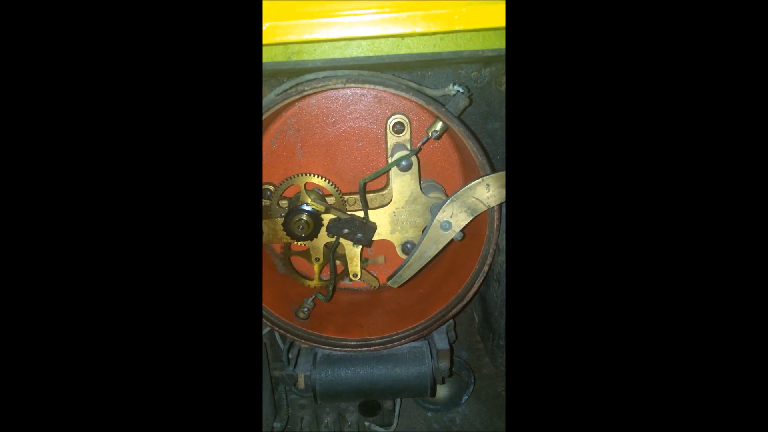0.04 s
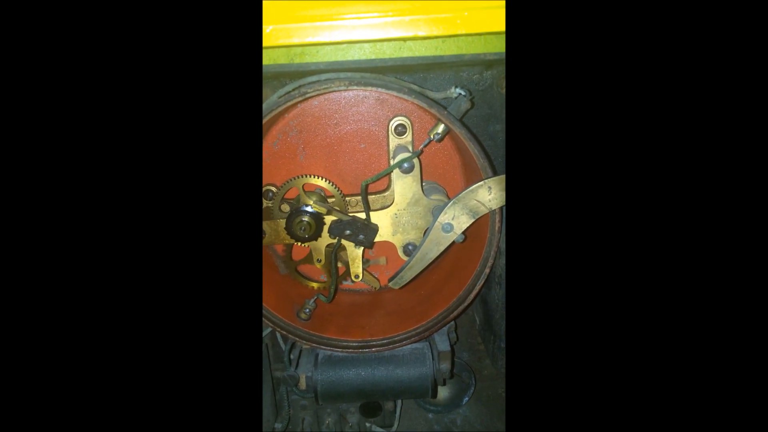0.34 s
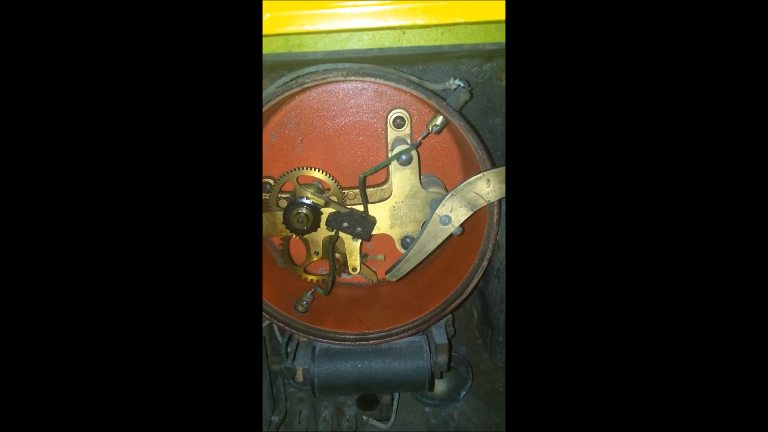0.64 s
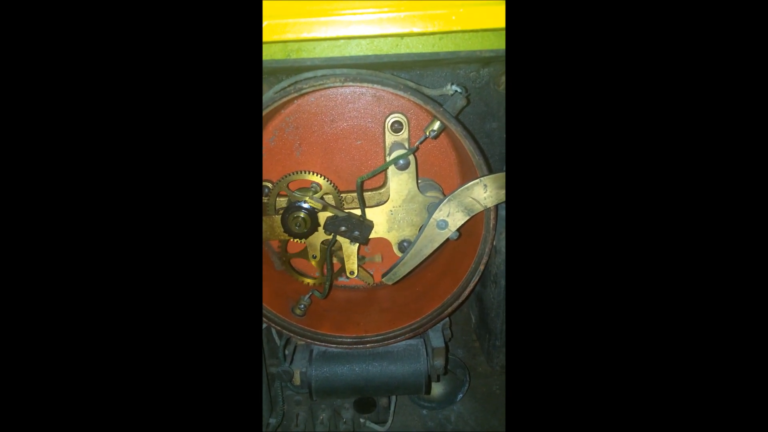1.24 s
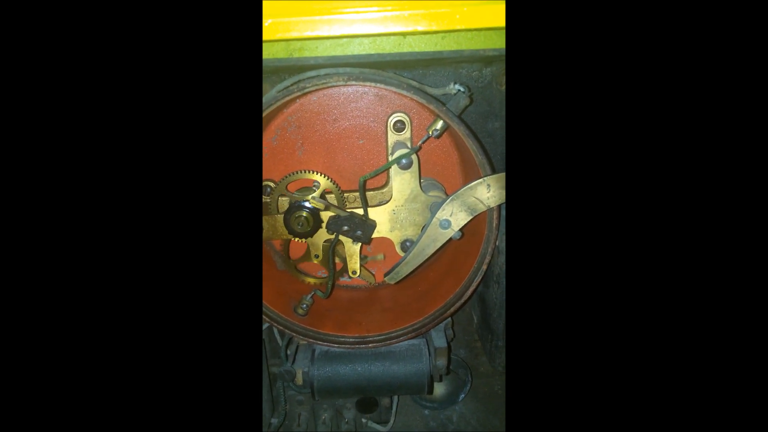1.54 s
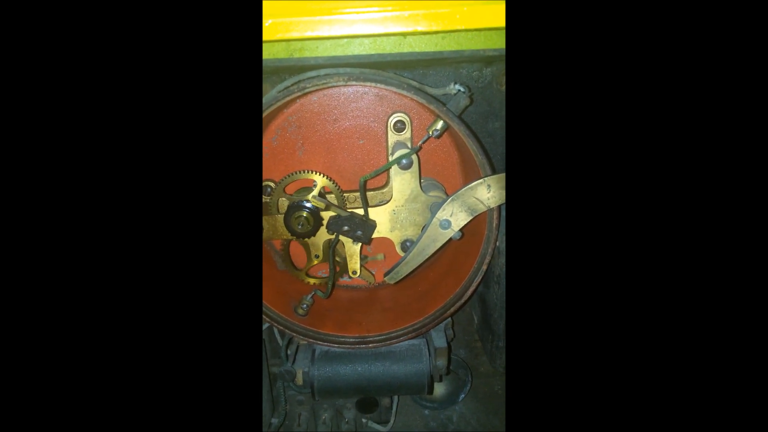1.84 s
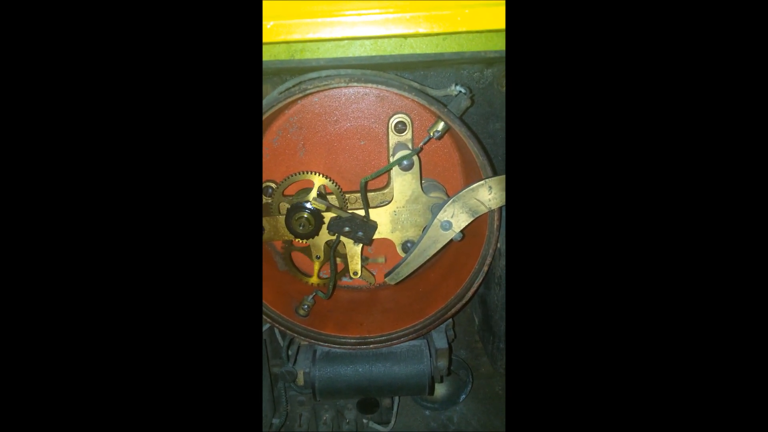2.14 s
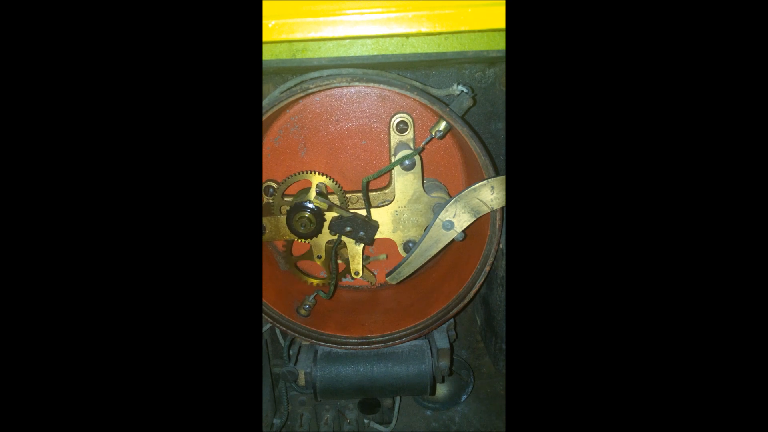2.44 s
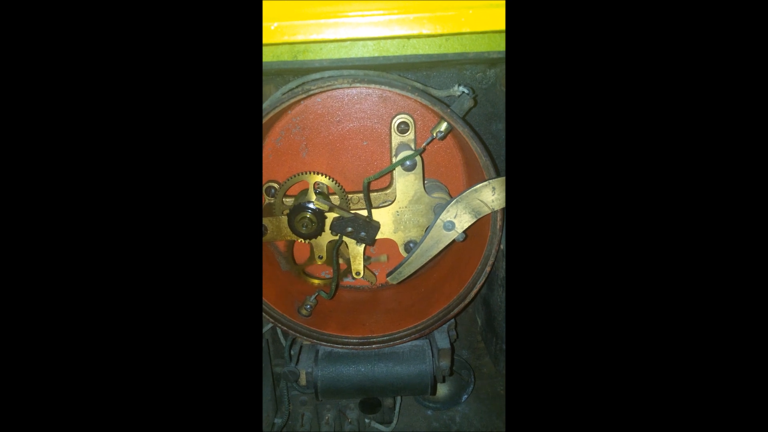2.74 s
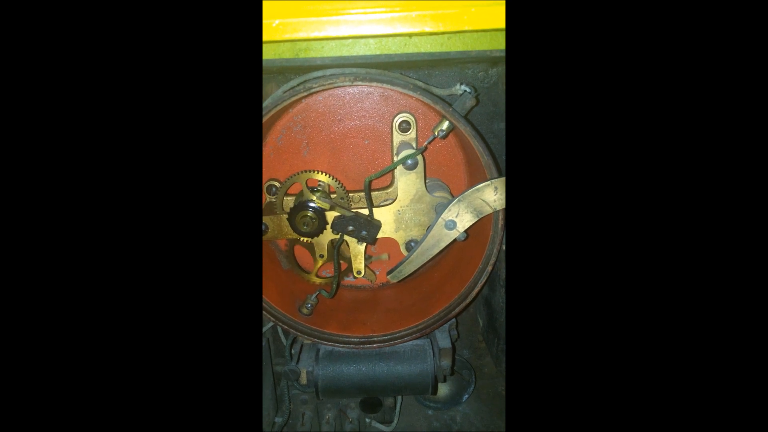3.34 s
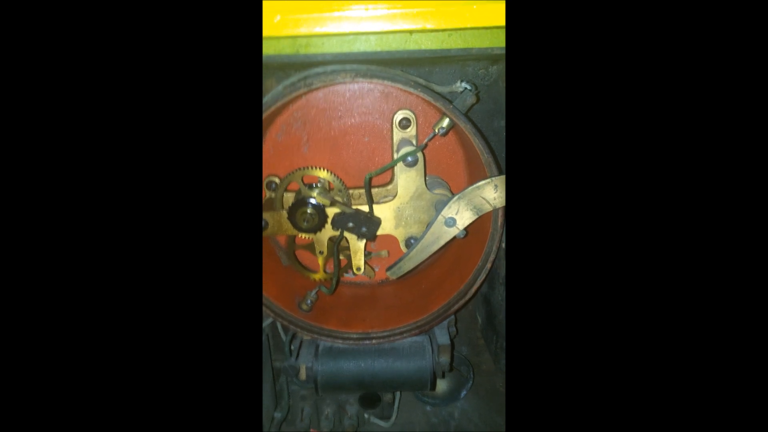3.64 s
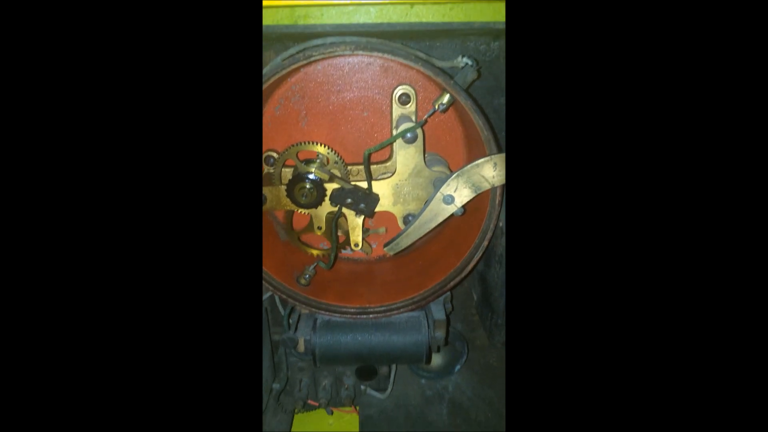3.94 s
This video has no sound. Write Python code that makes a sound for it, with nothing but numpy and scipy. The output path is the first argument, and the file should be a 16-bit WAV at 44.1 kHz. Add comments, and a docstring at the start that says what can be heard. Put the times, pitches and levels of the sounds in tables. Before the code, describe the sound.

Rapid ratcheting clatter of clockwork gears in an old alarm box, heard up close.

```python
"""Close beside an old alarm box, its clockwork runs down. The gear train grinds and ticks, while
the escapement's pallets strike the wheel teeth in a fast, limping rattle and chatter after each
blow. The impacts excite the normal modes of brass plates and the iron case, which ring briefly.
Now and then the rattle dips and thins to a ring; a few soft, low knocks lie underneath."""
import sys
import numpy as np
from scipy import signal
from scipy.fft import rfft, irfft, next_fast_len
from scipy.io import wavfile
from scipy.ndimage import uniform_filter1d

SR = 44100
rng = np.random.default_rng(int(sys.argv[2]) if len(sys.argv) > 2 else 0)


def waveform_to_disk(signal):
    """Save audio, clipped to [-1, 1], as 16-bit WAV at the path in sys.argv[1]."""
    frames = np.transpose(np.atleast_2d(signal))
    scaled = np.clip(frames, -1, 1) * 32767
    samples = np.round(scaled).astype(np.int16)
    wavfile.write(sys.argv[1], SR, samples)


N = 176400
ATTACK_S, TOP_HZ = 0.00078, 15300  # rise time of an impact; upper band limit

# friction of the gear train (time [s], level [dB])
GRIND_LEVEL = [(0, -24.5), (.3, -32.5), (.5, -27), (.8, -30), (.92, -28), (1.1, -26.5), (1.38, -28),
               (1.7, -28), (1.85, -27), (2.08, -29.5), (2.33, -25), (2.6, -29), (2.85, -27.5), (3.2, -27),
               (3.45, -28), (3.68, -25.5), (4, -33)]
# pallet strikes (time [s], level [dB], level offset of the chatter [dB])
PALLET_STRIKES = [(0.0266, -16.5, -7.5), (0.0837, -12, -14), (0.1073, -16, -19), (0.1336, -16, -2),
                  (0.16, -18, -18), (0.197, -17.5, -23), (0.2164, -15.5, -27), (0.2405, -10.5, -10),
                  (0.2601, -14.5, -21), (0.285, -11.5, -8), (0.3071, -18, 0), (0.335, -15.5, -5),
                  (0.3671, -15.5, -14), (0.3874, -8, -6), (0.4112, -13.5, -8), (0.43, -9.5, -8.5),
                  (0.4602, -14, -7), (0.477, -8.5, -7), (0.496, -30, -18), (0.5142, -10, -3.5),
                  (0.5355, -13.5, -11), (0.5597, -13, -20), (0.6014, -8.5, -14), (0.625, -15.5, -7),
                  (0.6485, -12.5, -15), (0.663, -23, -18), (0.683, -22, -20), (0.7023, -10, -8),
                  (0.7308, -18.5, -9), (0.7551, -12, -24), (0.7882, -17, -20), (0.8109, -11.5, -22),
                  (0.852, -17.5, -19), (0.875, -11, -24), (0.938, -14, -7), (0.9489, -12, -6),
                  (0.9725, -16, -26), (0.9951, -10, -2), (1.011, -14, -22), (1.0344, -7, -13),
                  (1.0614, -15, -5), (1.0783, -10.5, 0), (1.0989, -15.5, 1), (1.1138, -9.5, -8),
                  (1.1369, -16.5, 0.5), (1.1504, -9.5, -7), (1.1898, -11.5, -3), (1.225, -9.5, -6),
                  (1.2454, -18, -19), (1.263, -11, -6.5), (1.3013, -13, -1.5), (1.3457, -13, -28),
                  (1.382, -22.5, -10), (1.4042, -17, -19), (1.4367, -15.5, -29), (1.456, -8.5, -7),
                  (1.4711, -9.5, -12.5), (1.5003, -12.5, -9.5), (1.521, -19, 3), (1.5423, -14, -7),
                  (1.572, -19, -3), (1.5914, -10.5, -9), (1.6211, -13.5, -9), (1.6383, -8, -9),
                  (1.6546, -15, -21), (1.6709, -8.5, -5), (1.7029, -7, -14.5), (1.7262, -15, -13),
                  (1.744, -17.5, 3), (1.772, -17, -5), (1.791, -13.5, -35), (1.8168, -22.5, -4),
                  (1.8389, -12.5, -20), (1.874, -17, -14), (1.8952, -15.5, -0.5), (1.9305, -12.5, -8),
                  (1.986, -15.5, -16), (2.0197, -17, -28), (2.0436, -11, -25), (2.084, -15.5, -22),
                  (2.1079, -11.5, -12), (2.1426, -15.5, -29), (2.1632, -11.5, -5), (2.1828, -10.5, -12),
                  (2.2046, -12.5, -7), (2.2462, -10.5, -8.5), (2.2731, -15, -6), (2.2881, -8.5, -4.5),
                  (2.3209, -7, -11), (2.3569, -9, -10), (2.4038, -12.5, -7), (2.45, -11, -9),
                  (2.4702, -18, -8), (2.4902, -12, -21), (2.5228, -13, -13), (2.561, -17.5, -13),
                  (2.592, -18.5, -12), (2.629, -23.5, -2), (2.6548, -12.5, -11), (2.6796, -17.5, -12),
                  (2.702, -24.5, 5.5), (2.7318, -14.5, -11), (2.7493, -9.5, -1), (2.7698, -21, 1),
                  (2.7849, -7, -10), (2.8153, -15.5, -5), (2.8354, -10, -7), (2.8622, -15, -23),
                  (2.8769, -8, -4), (2.9073, -8.5, -6.5), (2.929, -16, -15), (2.9451, -10, -6),
                  (2.9816, -9, -9), (3.0195, -7.5, -8), (3.0408, -10, -15), (3.0608, -16, -3),
                  (3.0817, -14.5, -3), (3.104, -14, -3.5), (3.1596, -14.5, -23), (3.174, -22, -15),
                  (3.1902, -9.5, -6), (3.2093, -16, -10), (3.2264, -8.5, -18), (3.2522, -16.5, -21),
                  (3.2657, -9, -7), (3.286, -22, -6), (3.3013, -8.5, -6.5), (3.337, -11.5, -6),
                  (3.38, -12, -8.5), (3.4047, -21, -24), (3.4204, -8.5, -4), (3.4387, -15, -21),
                  (3.4704, -14, -15), (3.4914, -18.5, -13), (3.5088, -8.5, -6.5), (3.5488, -10.5, -14),
                  (3.5751, -16, -8), (3.5928, -9.5, -7.5), (3.6279, -9.5, -8), (3.6692, -9, -9),
                  (3.6862, -17.5, -0.5), (3.7128, -19.5, -0.5), (3.7588, -9, -19), (3.7924, -20, -4),
                  (3.8142, -11, -4), (3.8526, -13, -13), (3.882, -20, -5), (3.8995, -15.5, -5),
                  (3.931, -15.5, -20), (3.955, -10.5, -15), (3.9768, -16, -6)]
# modes of the brass plates and levers (frequency [Hz], T60 [s], level [dB])
BRASS_MODES = [(1895, 0.28, -3), (2990, 0.12, -9.5), (3031, 0.035, 3), (3113, 0.029, 1),
               (3976, 0.029, -0.5), (4624, 0.044, -1), (4732, 0.044, -2), (5307, 0.035, 0),
               (6100, 0.031, -4), (6960, 0.02, -4), (7260, 0.054, -2), (7850, 0.025, -0.5),
               (8246, 0.021, -1), (9175, 0.038, -2)]
# dips in the rattle (time [s], length [s], ring level [dB], first tone [Hz], second tone [Hz])
RATTLE_DIPS = [(.182, .014, -21, 3978, 8170), (.587, 0.014, -20, 3084, 8000), (.925, 0.03, -35, 5330, 3994),
               (1.171, 0.01, -20.5, 7340, 1870), (1.418, 0.0097, -24, 4021, 4720),
               (1.759, 0.016, -21, 7897, 1870), (2.228, 0.015, -23.5, 4800, 5270),
               (2.539, 0.027, -24, 6013, 2990), (2.697, 0.014, -22.5, 8230, 1420),
               (3.148, 0.01, -21, 5598, 3074), (3.36, 0.019, -19.5, 3010, 5340),
               (3.914, .016, -24.5, 1990, 9458)]


def amp(db):
    """Amplitude ratio of a level in decibels."""
    return 10 ** (np.asarray(db) / 20)


def unit(x):
    """Normalisation to rms 1."""
    return x / np.sqrt(np.mean(x ** 2))


def curve(rows, t):
    """Gain interpolated in decibels between rows of (time [s], level [dB])."""
    return amp(np.interp(t, *np.array(rows).T))


def butterworth(x, order, hz, kind):
    """Filter with a maximally flat passband."""
    return signal.sosfilt(signal.butter(order, hz, kind, fs=SR, output="sos"), x)


def through(x, response):
    """Convolution with an impulse response scaled to unit energy."""
    return signal.fftconvolve(x, response / np.linalg.norm(response))[:N]


def colour(points, size=2048):
    """Minimum-phase impulse response of a given spectrum, found by folding the cepstrum."""
    hz, db = np.array(points).T
    f = np.maximum(np.arange(size // 2 + 1) * SR / size, 1)
    magnitude = amp(np.interp(np.log(f), np.log(hz), db))
    cepstrum = irfft(np.log(magnitude))
    cepstrum[1:size // 2] *= 2
    cepstrum[size // 2 + 1:] = 0
    return irfft(np.exp(rfft(cepstrum)))


def tooth_load(t, drop_s=0.01, drop_db=2):
    """Contact noise follows load: its gain falls as the wheel drops free ahead of each strike."""
    strikes = np.sort(np.array(PALLET_STRIKES)[:, 0])
    wait = np.append(strikes, np.inf)[np.searchsorted(strikes, t)] - t
    return amp(-drop_db * np.exp(-(wait / drop_s) ** 2))


def friction(t, grain_db=4):
    """Sliding friction of meshing teeth gives a continuous, grainy random force."""
    grains = rng.standard_normal(N) * amp(grain_db * rng.standard_normal(N))
    return unit(grains) * curve(GRIND_LEVEL, t)


def gear_train(t):
    """Friction noise: loaded teeth grind, with less top treble than the clicks."""
    # spectrum of the grinding teeth (frequency [Hz], spectral level [dB])
    teeth_spectrum = [(25, -23), (70, -9.5), (190, -19), (250, -23.5), (340, 3.5), (550, -7), (700, 5.5),
                      (900, -0.5), (1100, -1), (1900, 8), (2700, -3.5), (4500, -6.5), (8000, -14),
                      (15000, -5.5)]
    grind = through(friction(t) * tooth_load(t), colour(teeth_spectrum))
    return amp(-3) * butterworth(grind, 3, 8000, "low")


def wander(shifts_per_s=25):
    """Slow random modulation with a spread near 1, renewed about once a tooth."""
    steps = rng.standard_normal(int(shifts_per_s * N / SR) + 2)
    position = np.arange(N) * shifts_per_s / SR + rng.random()
    return np.interp(position, np.arange(len(steps)), steps)


def ring(force, modes, drift, spread_db=2.2):
    """Modal superposition: damped modes shift in pitch and strength as turning parts press on a body."""
    out = np.zeros(N)
    for hz, t60, db in modes:
        phasor = np.exp(2j * np.pi * np.cumsum(hz * (1 + drift * wander())) / SR)
        pole = np.exp(-np.log(1000) / (t60 * SR))
        drive = force * amp(spread_db * wander())
        mode = phasor * signal.lfilter([1], [1, -pole], drive * phasor.conj())
        out += rng.choice([-1, 1]) * amp(db) * np.sqrt(2 * (1 - pole ** 2)) * mode.imag
    radiated = butterworth(out, 3, 242, "high")  # small bodies radiate little bass
    return radiated / np.linalg.norm(amp(np.array(modes)[:, 2]))


def iron_case(impacts, t):
    """Forced vibration: impacts and gear friction drive the modes of the case."""
    # modes of the iron case (frequency [Hz], T60 [s], level [dB])
    case_modes = [(189.5, 0.15, -16), (354, 0.76, -9), (390, 0.2, -11), (445.6, 0.39, -13),
                  (501, 0.14, -14.5), (628.8, 0.18, -3.5), (681.8, 0.2, -1), (715, 0.35, -5.5),
                  (797, 0.15, -1.5), (822.5, 0.29, -1.5), (1056, 0.014, 0), (1293, 0.027, -2),
                  (1391.5, 0.14, 0.5), (1495, 0.071, 0), (1673, 0.049, -6), (1697, 0.071, -3.5),
                  (2047, 0.025, -3), (2103, 0.026, 3.5)]
    return ring(amp(-10) * impacts + amp(-8) * friction(t), case_modes, drift=.008)


def contacts(times, gains, rise_s, decay_s, grain_db):
    """Tiny metal contacts merge into decaying noise bursts, each with the energy of 5 ms at rms = gain."""
    size = SR // 20
    t, out = np.arange(size) / SR, np.zeros(N + 2 * size)
    envelope = np.minimum(t / rise_s, 1) * np.exp(-np.maximum(t - rise_s, 0) / decay_s)
    for start, gain in zip(times, gains):
        noise, grain = rng.standard_normal((2, size))
        burst = envelope * noise * amp(grain_db * grain)
        i = int(np.clip(start * SR, 0, N))
        out[i:i + size] += gain * burst * np.sqrt(.005 * SR / np.sum(burst ** 2))
    return out[:N]


def backlash(ticks_per_s=85, level_db=2, spread_db=2):
    """Clearance lets loose gear teeth collide, ticking at uneven moments."""
    count = int(ticks_per_s * N / SR)
    times = (np.arange(count) + rng.random(count)) * N / SR / count
    gains = curve(GRIND_LEVEL, times) * amp(level_db + spread_db * rng.standard_normal(count))
    return contacts(times, gains, ATTACK_S, decay_s=0.0027, grain_db=2)


def metal_clack(force):
    """Source and filter: the contact force takes on the spectrum of metal hitting metal."""
    # spectrum of the clack (frequency [Hz], spectral level [dB])
    clack_spectrum = [(150, -30), (600, -39), (1100, -19.5), (1500, -2.5), (2200, 0), (2700, -3),
                      (3100, 5.5), (3600, -9), (4500, 1.5), (5000, -6), (5700, -3), (6300, 0), (8200, -1),
                      (8700, -13), (11000, -7.5), (15000, -20)]
    return amp(-3.5) * through(force, colour(clack_spectrum))


def tip_snap(force, t):
    """Impacts of the tooth tips radiate a bright, high-frequency snap."""
    # spectrum of the snap (frequency [Hz], spectral level [dB])
    snap_spectrum = [(2000, -28), (6000, -30), (8000, 2.5), (12500, 4), (13300, 0), (15200, -7)]
    # slow swell and fall of the treble (time [s], level [dB])
    treble_level = [(0, -2.5), (.62, 3.5), (.84, -2.5), (1.1, 0), (2.33, 0.5), (2.75, .5), (4, 0.5)]
    return amp(-10.5) * curve(treble_level, t) * through(force, colour(snap_spectrum))


def housing(x, t60_s=0.049, build_s=0.0055):
    """Reverberation: short, dense reflections in the open housing return little of the treble."""
    t = np.arange(SR // 4) / SR
    tail = rng.standard_normal(len(t)) * np.exp(-np.log(1000) * t / t60_s) * np.minimum(t / build_s, 1)
    return x + amp(-5) * butterworth(through(x, tail), 2, 4500, "low")


def plate(x, travel_s=0.001627):
    """Dispersion: bending waves carry treble ahead and smear each click; travel_s holds at 1 kHz."""
    size = next_fast_len(N + SR)
    f = np.arange(size // 2 + 1) * SR / size
    lag_cycles = travel_s * (2 * np.sqrt(1000 * f) - f * np.sqrt(1000 / TOP_HZ))  # no delay at TOP_HZ
    radiated = butterworth(x, 2, 1160, "high")  # a small plate radiates little bass
    return irfft(rfft(radiated, size) * np.exp(-2j * np.pi * lag_cycles), size)[:N]


def bouncing(bounces_per_s=200, spread_db=2.5):
    """Amplitude modulation: a gain that jumps about as loose parts hop and land."""
    size = int(SR / bounces_per_s)
    steps = np.repeat(rng.standard_normal(N // size + 1), size)[:N]
    return unit(uniform_filter1d(amp(spread_db * steps), size // 3))


def escapement(t, spread_db, hardness=0, blow_decay_s=.0028, chatter_decay_s=.017):
    """Impact and rebound: each pallet hits a slightly different spot of a tooth, bounces and scrapes."""
    times, db, chatter_db = np.array(PALLET_STRIKES).T
    db = db + hardness * (db - db.mean())  # hardness: extra dB for each dB of force
    db += spread_db * rng.standard_normal(len(db))
    blows = contacts(times, amp(db - 4), ATTACK_S, blow_decay_s, grain_db=2.5)
    delay_s, rise_s = .0035, .0027
    chatter = contacts(times + delay_s, amp(db + chatter_db + .5), rise_s, chatter_decay_s, grain_db=4)
    return blows + chatter * bouncing() * tooth_load(t)


def dips(t, depth_db_per_s):
    """Brief attenuation: the gain falls at each dip, by decibels proportional to its length."""
    notches = sum(length * np.exp(-(2 * (t - at) / length) ** 4) for at, length, *_ in RATTLE_DIPS)
    return amp(-depth_db_per_s * notches)


def thin_rings(t, lead_db=11, spread_db=3):
    """Sum of partials: in each dip two tones stand out over the fainter brass modes."""
    mode_hz, _, mode_db = np.array(BRASS_MODES).T
    out = np.zeros(N)
    for at, length, db, *lead_hz in RATTLE_DIPS:
        near = np.abs(t - at) < length
        hz = np.append(mode_hz, lead_hz)
        gains = amp(np.append(mode_db + spread_db * rng.standard_normal(len(mode_db)), [lead_db] * 2))
        cycles = np.outer(hz, t[near]) + rng.random((len(hz), 1))
        window = np.cos(np.pi / 2 * (t[near] - at) / length)
        out[near] += amp(db) * unit(gains @ np.sin(2 * np.pi * cycles)) * window
    return out


def bumps(t, hz=71, width_s=0.027):
    """Low band-limited noise under Gaussian envelopes is heard as soft knocks."""
    # dull low knocks (time [s], level [dB])
    knocks = [(.745, -56), (2.05, -48), (2.335, -51), (2.74, -50), (2.96, -46), (3.2, -56)]
    swell = sum(amp(db) * np.exp(-.5 * ((t - start - width_s) / width_s) ** 2) for start, db in knocks)
    rumble = butterworth(rng.standard_normal(N), 3, [hz / 2, hz * 1.63], "band")
    return swell * unit(rumble)


def scene():
    """Superposition of the clockwork's impacts, resonances and friction in one channel."""
    t = np.arange(N) / SR
    ticks = backlash() * tooth_load(t)
    clack_force = escapement(t, spread_db=.5) + ticks
    # the treble of each strike dies sooner
    tip_force = escapement(t, spread_db=1.2, hardness=.35, blow_decay_s=.0027, chatter_decay_s=.015)
    tip_force += amp(3.5) * ticks
    body_force = escapement(t, spread_db=.7) + ticks
    brass = amp(-2.5) * ring(body_force, BRASS_MODES, drift=.005)
    case = iron_case(body_force, t)
    rattle = plate(housing(metal_clack(clack_force)) + tip_snap(tip_force, t)) + brass
    clockwork = dips(t, 900) * (rattle + gear_train(t)) + dips(t, 450) * case
    return (clockwork + thin_rings(t) + bumps(t))[None]


def record(dry):
    """Hard clipping at full scale, then a steep low-pass band limit."""
    return signal.sosfilt(signal.ellip(10, .2, 80, TOP_HZ, fs=SR, output="sos"), np.clip(dry, -1, 1))


dry = scene()
out = record(dry)
waveform_to_disk(out)
```